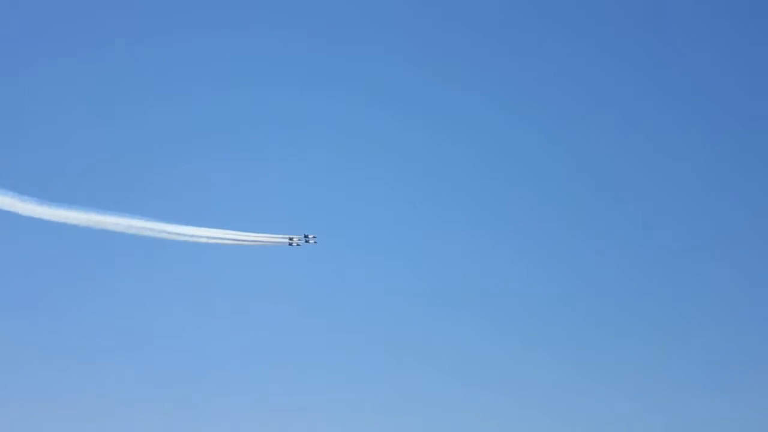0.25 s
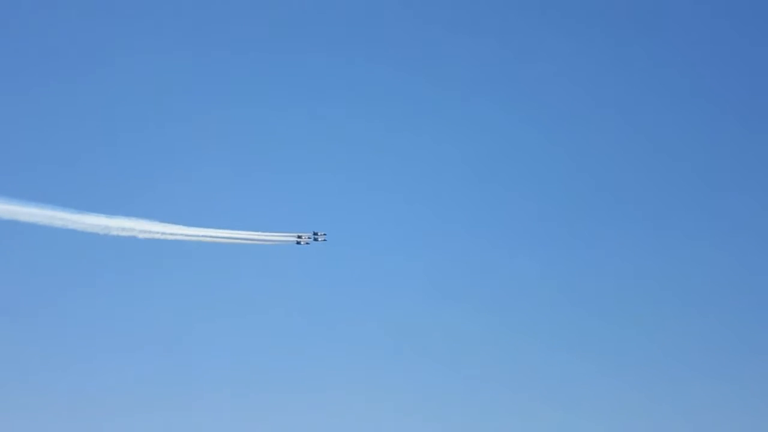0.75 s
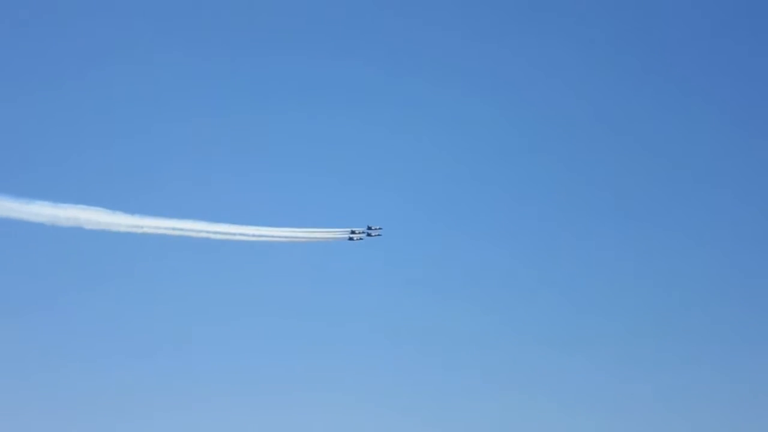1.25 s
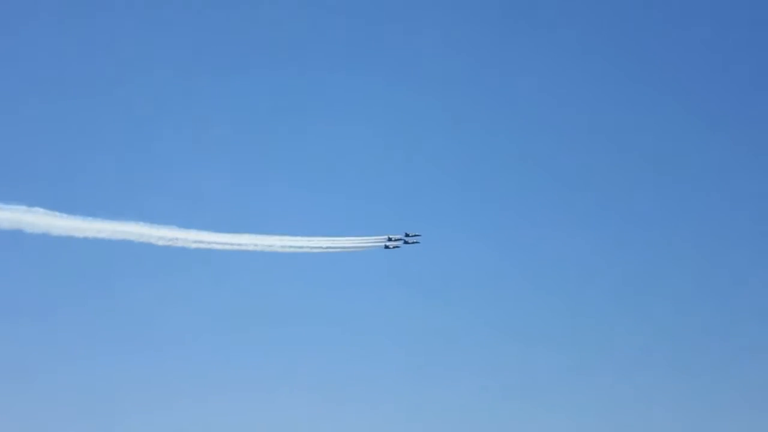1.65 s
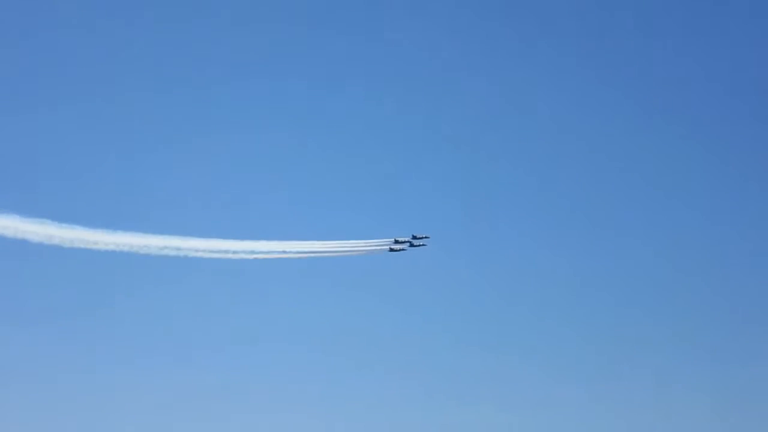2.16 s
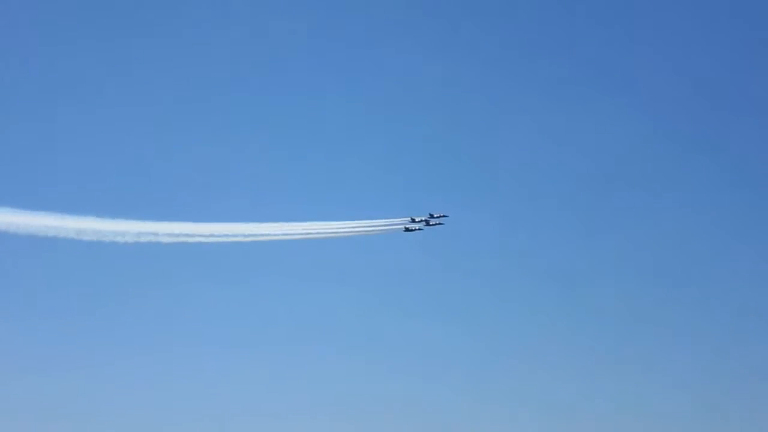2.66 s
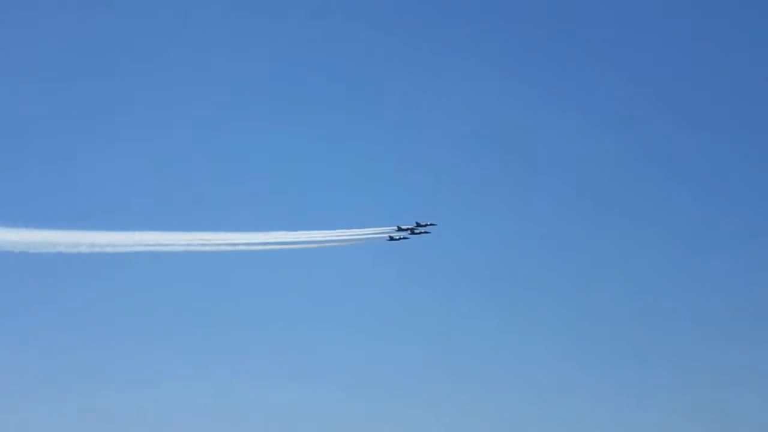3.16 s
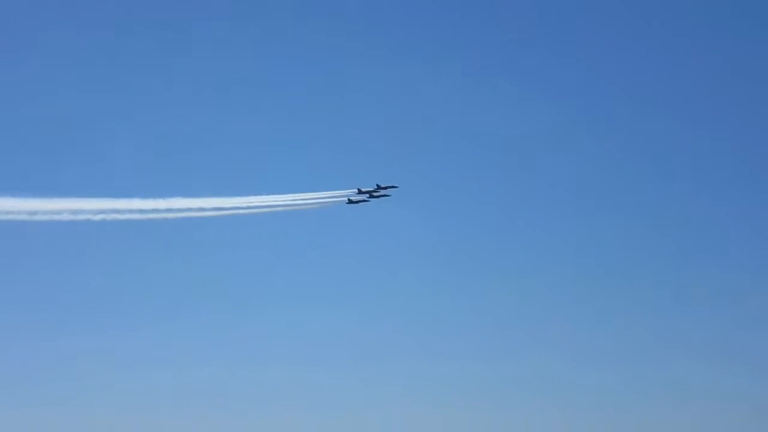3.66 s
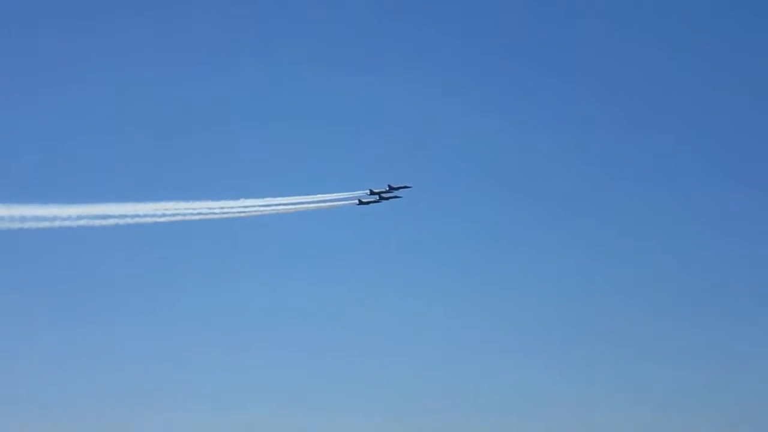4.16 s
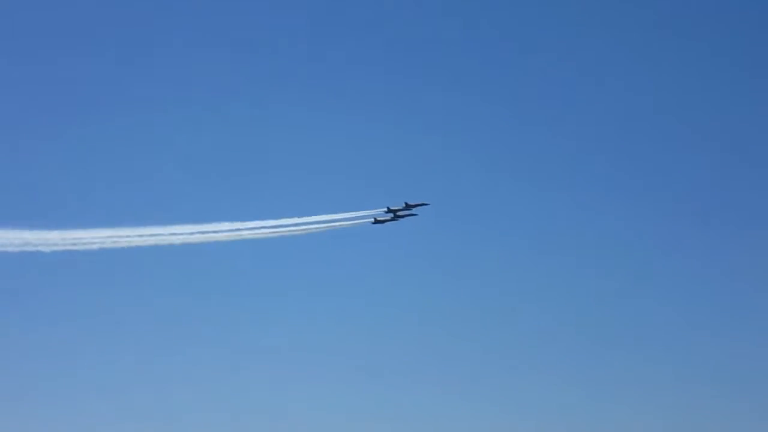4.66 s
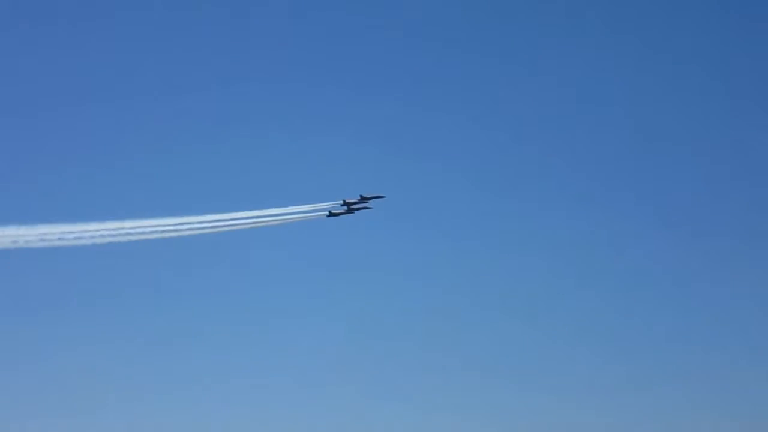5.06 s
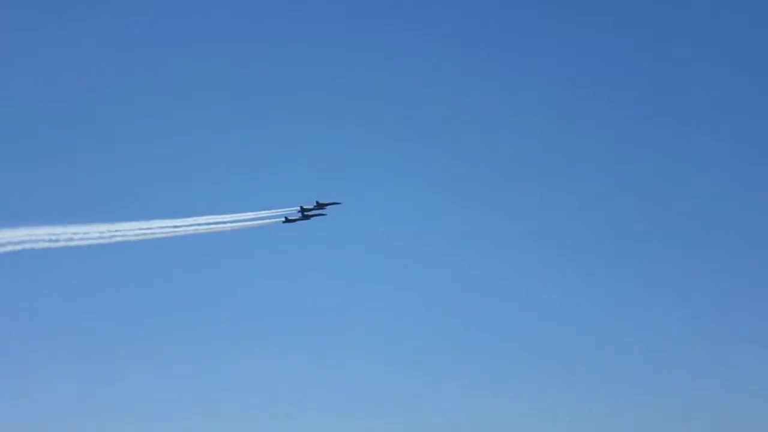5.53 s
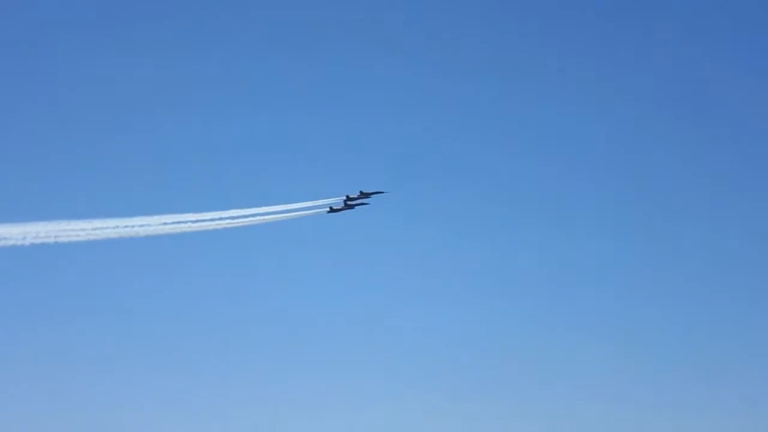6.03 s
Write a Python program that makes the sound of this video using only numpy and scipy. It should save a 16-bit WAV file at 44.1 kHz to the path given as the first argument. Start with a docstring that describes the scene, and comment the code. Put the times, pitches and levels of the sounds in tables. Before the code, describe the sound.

Distant jets rumble low across an open sky, then their hollow roar surges into loud ragged bursts while wind thumps the microphone.

```python
"""A deep rumble and a faint hollow roar, noise shaped in fluttering bands, come from jets high in the sky.
Wind noise and thumps, short low cycles, strike the microphone; wavering hums and faint short high tones
come and go. Wavelets form sharp crests, first of the rumble, then of the roar as it surges near 800 Hz.
Meanwhile a thin bright hiss with two steady whines sinks, mostly step by step and creeping back between.
In the loudest surges of the later roar, filtered impulses add sharp ticks and a faint crackle."""
import sys
import numpy as np
from scipy import signal
from scipy.fft import rfft, irfft, next_fast_len
from scipy.io import wavfile
from scipy.ndimage import uniform_filter1d, minimum_filter1d

SR = 44100
rng = np.random.default_rng(int(sys.argv[2]) if len(sys.argv) > 2 else 0)


def output_pcm(signal):
    """Save a mono or channel-first signal as 16-bit PCM at the path in sys.argv[1].

    Samples are clipped to [-1, 1] before scaling.
    """
    pcm = np.clip(np.atleast_2d(signal).T, -1, 1) * 32767
    wavfile.write(sys.argv[1], SR, np.round(pcm).astype(np.int16))


N = 277389   # samples

# Levels are those of each source before the limiter; a spectrum's levels are relative.
# Hollow roar, torn into surges: (time [s], level [dB])
ROAR_LEVEL = [(0.0, -34.5), (0.14, -37), (1.12, -30), (1.89, -30.5), (2.94, -22), (3.03, -16.5),
              (3.25, -16.5), (3.5, -19), (3.87, -20), (3.94, -23.5), (4.09, -20.5), (4.105, -22),
              (4.15, -26), (4.17, -19), (4.3, -17.5), (4.43, -12.5), (4.45, -11.5), (4.52, -19),
              (4.55, -13.5), (4.58, -16), (4.6, -8), (4.615, -16.5), (4.64, -13), (4.68, -21), (4.85, -11),
              (4.92, -17.5), (5.03, -13), (5.2, -15.5), (5.26, -9), (5.29, -21), (5.32, -14.5),
              (5.38, -24.5), (5.39, -21), (5.51, -21.5), (5.55, -16), (5.61, -24.5), (5.64, -16),
              (5.69, -23.5), (5.71, -3.5), (5.79, -16), (5.86, -12.5), (5.885, -20.5), (5.91, -11.5),
              (5.95, -17.5), (5.98, -12.5), (6.04, -8.5), (6.09, -17.5), (6.12, -13.5), (6.18, -18),
              (6.22, -17.5), (6.29, -15)]
# Band of the hollow roar: (time [s], centre [Hz], width [factor])
ROAR_BAND = [(0, 657, 1.3), (2, 690, 1.28), (3.1, 682, 1.18), (3.9, 719, 1.2), (4.2, 749, 0.96),
             (4.33, 810, .85), (4.45, 775, 0.87), (4.6, 740, .85), (4.85, 770, 1.1), (5.0, 800, 1.2),
             (5.3, 804, 1.18), (5.6, 810, 1.1), (5.72, 790, .6), (5.82, 820, 1.2), (5.91, 860, 0.97),
             (5.98, 790, 1.5), (6.06, 810, 1), (6.17, 860, 1.1), (6.29, 830, 1.1)]
ROAR_LOW_OCT, ROAR_HIGH_OCT = 0.18, 0.24   # widths below and above the centre, before the factor
ROAR_SKIRT_DB, ROAR_WANDER_HZ = -19.5, 28.7   # floor of the bell; rms wander of its centre

# Sharp crests of the rumble (near 300 Hz) and of the roar (700-900 Hz):
# (time [s], envelope peak [dB], pitch [Hz])
CRESTS = [(1.033, -14, 300), (1.11, -17, 310), (2.81, -14, 340), (2.995, -14, 300), (3.17, -12, 285),
          (4.221, -8, 800), (4.382, -6, 760), (4.440, -2.5, 790), (4.449, -6, 770), (4.591, -5, 730),
          (4.625, -6, 736), (4.639, -3, 780), (4.805, -7, 760), (4.845, -5, 762), (5.018, -7, 760),
          (5.04, -6, 716), (5.098, -6, 851), (5.255, -5, 880), (5.312, -10, 866), (5.68, -11, 800),
          (5.715, -5, 812), (5.74, -5, 780), (5.772, -5.5, 803), (5.781, -6, 800), (5.912, -7, 830),
          (5.959, -7, 773), (6.024, -5, 760), (6.044, -5, 780), (6.0565, -1, 790), (6.075, -5, 780)]
CREST_CYCLES = 2.4   # envelope half-width at 1/e
CREST_SHARE, CREST_LULL_S = 0.75, 0.011   # part of the roar withdrawn around a crest, and for how long

# Deep rumble: (time [s], level [dB])
RUMBLE_LEVEL = [(0.0, -28.5), (0.65, -32.5), (1.03, -21), (1.23, -28.5), (1.26, -23), (1.65, -28),
                (2.07, -22), (2.1, -28), (2.47, -29), (2.5, -22.5), (2.68, -27), (2.82, -16.5), (2.87, -18),
                (2.94, -22), (3.0, -19.5), (3.08, -21), (3.19, -18), (3.26, -17), (3.32, -19), (3.48, -25),
                (3.64, -20.5), (3.98, -33.5), (4.05, -23.5), (4.1, -33), (4.17, -28), (4.2, -31.5),
                (4.26, -29.5), (4.35, -32), (4.5, -25.5), (4.57, -32.5), (4.62, -20.5), (4.66, -33),
                (5.19, -25.5), (5.32, -36), (5.87, -26.5), (5.92, -31.5), (6.04, -22), (6.24, -34.5),
                (6.29, -26.5)]
# Centre of the rumble: (time [s], frequency [Hz])
RUMBLE_CENTRE = [(0, 286.7), (1.1, 281), (1.6, 337), (2.0, 311), (2.8, 322), (3.17, 295.3), (3.4, 374),
                 (4.2, 320.5), (5.4, 416), (6.29, 400)]
RUMBLE_LOW_OCT, RUMBLE_HIGH_OCT, RUMBLE_SKIRT_DB = 0.32, 0.4, -6   # widths below and above; floor

# Upper roar: (time [s], level [dB], tilt [dB per octave])
UPPER_LEVEL = [(0.0, -44.5, 5), (2.0, -43.5, 5.5), (2.25, -44.5, 5.5), (2.5, -43, 5), (3.17, -35.5, 1.5),
               (3.7, -37, 0.5), (4.13, -39.5, 1.5), (4.45, -32, 0), (4.75, -33.5, -3), (5.03, -28.5, 2),
               (5.38, -31, -2), (5.99, -26, 3.5), (6.06, -21.5, -0.5), (6.1, -27, 1), (6.29, -28, 1.7)]
# Spectral density of the upper roar before tilting: (frequency [Hz], level [dB per Hz])
UPPER_COLOUR = [(1000, -2), (1430, -7.5), (1830, -23), (2300, -38), (2700, -47.5), (3100, -59), (3900, -80)]

# Ground dip in the rumble and roar
DIP_START_HZ, DIP_RISE_HZ_S, DIP_WIDTH_OCT = 452, 11, 0.12
DIP_DB, DIP_GONE_S = -12.5, 2.8   # depth at the start; time at which it has faded

# Ticks on the roar's crests: (time [s], peak [dB], second swing relative to the first [dB])
TICKS = [(3.964, -44, -2), (4.440, -48, -3), (4.6402, -30, -20), (4.849, -47, -5), (5.100, -47, -5),
         (5.258, -45, -5), (5.717, -49, -6), (5.742, -52, -8), (5.774, -50, -6), (6.035, -50, -8),
         (6.0415, -46, -8), (6.0565, -30, -6)]
TICK_TWIN_S = 0.0006   # delay of the second, opposite impulse
# Most impulses per second; their rms peak; roar level at which that rate is reached
CRACKLE_PER_S, CRACKLE_DB, CRACKLE_ABOVE_DB = 230, -62.5, -10

# Wind on the microphone: (time [s], level [dB])
WIND_LEVEL = [(0.0, -32.5), (0.3, -30), (0.47, -32), (0.66, -33.5), (1.21, -30.5), (1.37, -22),
              (1.59, -30.5), (2.31, -30), (2.45, -27), (2.8, -21.5), (3.1, -20), (3.22, -20), (3.52, -18.5),
              (3.75, -24), (4.31, -25.5), (4.64, -29), (4.84, -28), (5.06, -29), (5.29, -31), (5.57, -35),
              (5.92, -29), (6.29, -34)]
# Brightness of the wind: (time [s], tilt [dB per octave])
WIND_TILT = [(0, -6.5), (1.3, -4.5), (2.6, -6.5), (3.1, -3.5), (3.6, -1.5), (4.2, -2.5), (6.29, 0.9)]
# Spectral density of the wind before tilting: (frequency [Hz], level [dB per Hz])
WIND_COLOUR = [(12, -37), (20, -15.5), (75, 0.5), (119, -1.5), (177, 5), (228, -9), (289, -15), (400, -5),
               (520, -35), (880, -120)]

# Wind thumps: (time [s], envelope peak [dB], pitch [Hz], envelope half-width at 1/e [cycles])
THUMPS = [(1.21, -17, 70, 1.2), (1.262, -10.5, 113, 0.74), (1.335, -15, 83, 0.74), (1.385, -13, 84, 0.98),
          (1.438, -5.5, 154, 0.45), (1.475, -13.5, 64, 1.1), (2.267, -7.5, 128, 0.64),
          (2.545, -13, 106, 0.74), (2.81, -14.5, 80, 2.1), (2.865, -13.5, 90, 0.75),
          (3.099, -9.5, 175, 0.39), (3.435, -8.5, 186, 0.7), (3.538, -9, 180, 1.7), (3.601, -10, 110, 0.22),
          (3.628, -9, 55, 0.9), (3.634, -1, 88, 0.21), (3.651, -3.5, 172, 0.5), (3.66, -16, 39.7, 0.7),
          (3.674, -5, 78, 0.5), (3.998, -5, 125, 0.36), (4.0388, 1.5, 344, 0.31), (4.042, -11.5, 178, 0.96),
          (4.053, -13.5, 105, 2), (4.077, -9, 151, 0.77), (4.156, -15.5, 450, 0.7),
          (4.162, -10.5, 310, 0.9), (4.214, -14, 81, 0.73), (4.249, -6, 195, 0.31),
          (4.51, -12.5, 183, 0.55), (4.635, -14.5, 190, 1)]

# Low hums and faint short high tones: (start [s], length [s], pitch [Hz], rms level [dB])
HUMS = [(0.27, 0.14, 2420, -62), (1.06, .18, 3830, -73), (1.875, 0.15, 175, -23.5),
        (2.115, 0.084, 2080, -62), (2.21, 0.099, 2050, -61), (2.45, 0.083, 2110, -62),
        (4.27, 0.37, 170.5, -31), (4.865, 0.26, 158.1, -27), (5.141, 0.097, 174.6, -26),
        (6.02, 0.4, 129.4, -34.5)]
HUM_FADE_S, HUM_WAVER = 0.033, 0.011   # linear fade; rms waver as a share of the pitch

# Hiss steps: (time [s], level just after the step [dB])
HISS_STEPS = [(0, -55.5), (3.25, -58.5), (3.69, -61.5), (4.051, -64), (4.45, -65.5), (4.645, -69.5),
              (5.27, -72), (5.79, -70.5)]
HISS_START_DB, HISS_RETURN_DB_S = HISS_STEPS[0][1], 0.5   # ceiling; creep back between steps
# Spectral density of the hiss at its starting level: (frequency [Hz], level [dB per Hz])
HISS_COLOUR = [(1400, 13), (2000, 16.5), (2500, 7), (3000, 5.5), (3600, 1.5), (5000, 0), (8000, -0.5),
               (10500, -3), (13000, -7), (15000, -15.5)]
# Extra loss for each dB the hiss has sunk: dB per octave above 10 kHz, and per octave below 4 kHz
HISS_DULL_DB_OCT, HISS_THIN_DB_OCT = 0.4, 0.4
# Steady whines: (frequency [Hz], rms level while the hiss is at its starting level [dB])
WHINES = [(7298, -88), (10298, -88)]

EVEN_S, EVEN_SHARE = 0.05, 0.24   # averaging time of noise swells; share of the swell levelled, in dB
CUTOFF_HZ = 15050   # upper edge of the recorded band


def jets():
    """Superposition: the pressures of the three noise bands and the crests add linearly."""
    return rumble() + roar() + upper_roar() + crests()


def roar():
    """Band-limited turbulence: jet noise, fluttered by eddies along its path, yields power around each crest."""
    level_db, = in_time(ROAR_LEVEL)
    centre_hz, width = in_time(ROAR_BAND)
    centre_hz = centre_hz + ROAR_WANDER_HZ * drift(5.2)

    def colour_db(hz):
        bell_db = hump_db(hz, centre_hz, width * ROAR_LOW_OCT, width * ROAR_HIGH_OCT, ROAR_SKIRT_DB)
        return bell_db + ground_dip_db(hz)

    noise = turbulent_noise(np.geomspace(520, 1250, 11), colour_db, 0.93, 1.2, 6.2)
    return crest_lull() * from_db(level_db) * noise


def crest_lull():
    """Amplitude weighting: smoothed rectangular windows lower the roar's gain around every crest."""
    marks, size = np.zeros(N), round(CREST_LULL_S * SR)
    marks[[round(s * SR) for s, _, _ in CRESTS]] = size
    windows = uniform_filter1d(marks, size=size)
    windows = uniform_filter1d(windows, size=size // 2)
    return 1 - CREST_SHARE * np.minimum(windows, 1)


def crests():
    """Wave packets: cycles under a Gaussian envelope form each sharp crest of the rumble or roar."""
    return wavelets([(*crest, CREST_CYCLES) for crest in CRESTS])


def rumble():
    """Band-limited turbulence: the low part of the jet noise, fluttered by eddies along its path."""
    level_db, = in_time(RUMBLE_LEVEL)
    centre_hz, = in_time(RUMBLE_CENTRE)

    def colour_db(hz):
        bell_db = hump_db(hz, centre_hz, RUMBLE_LOW_OCT, RUMBLE_HIGH_OCT, RUMBLE_SKIRT_DB)
        return bell_db + ground_dip_db(hz)

    return from_db(level_db) * turbulent_noise(np.geomspace(220, 560, 9), colour_db, 1.0, 0.5, 7.6)


def upper_roar():
    """Spectral roll-off: the upper jet noise falls steeply with frequency, under a changing tilt."""
    level_db, tilt_db = in_time(UPPER_LEVEL)

    def colour_db(hz):
        return at_hz(UPPER_COLOUR, hz) + tilt_db * np.log2(hz / 1300)

    return from_db(level_db) * turbulent_noise(np.geomspace(1050, 3800, 12), colour_db, 0.95, 0.91, 15.0)


def ground_dip_db(hz):
    """Spectral notch: a Gaussian dip in log frequency rises in pitch while its depth fades to nothing."""
    t = np.arange(N) / SR
    dip_hz = DIP_START_HZ + DIP_RISE_HZ_S * t
    depth_db = DIP_DB * np.clip(1 - t / DIP_GONE_S, 0, 1)
    return depth_db * np.exp(-(np.log2(hz / dip_hz) / DIP_WIDTH_OCT) ** 2)


def ticks():
    """Impulse response: isolated and random impulses ring a band-pass filter for a fraction of a millisecond."""
    band = signal.butter(2, [1500, 5000], "band", fs=SR, output="sos")
    roar_db, = in_time(ROAR_LEVEL)
    rate = CRACKLE_PER_S * np.minimum(from_db(3 * (roar_db - CRACKLE_ABOVE_DB)), 1)
    struck = rng.random(N) < rate / SR
    clicks = from_db(CRACKLE_DB) * rng.standard_normal(N) * struck
    for s, peak_db, twin_db in TICKS:
        clicks[round(s * SR)] = from_db(peak_db)
        clicks[round((s + TICK_TWIN_S) * SR)] = -from_db(peak_db + twin_db)
    unit_peak = np.abs(signal.sosfilt(band, signal.unit_impulse(64))).max()
    return signal.sosfilt(band, clicks + 1e-18) / unit_peak   # the tiny offset avoids denormal numbers


def wind():
    """Turbulent pressure: wind at the microphone is lumpy low noise whose spectral tilt varies in time."""
    level_db, = in_time(WIND_LEVEL)
    tilt_db, = in_time(WIND_TILT)

    def colour_db(hz):
        return at_hz(WIND_COLOUR, hz) + tilt_db * np.log2(hz / 80)

    return from_db(level_db) * turbulent_noise(np.geomspace(18, 240, 11), colour_db, 0.7, 1.0, 17.0)


def thumps():
    """Transient pressure: an eddy bursting on the microphone gives a short swing, mostly at low pitch."""
    return wavelets(THUMPS)


def hum():
    """Frequency modulation: integrating a slightly wavering pitch gives the phase of each faded tone."""
    out, t = np.zeros(N), np.arange(N) / SR
    for start, length, hz, level_db in HUMS:
        gate = np.clip(np.minimum(t - start, start + length - t) / HUM_FADE_S, 0, 1)
        cycles = np.cumsum(hz * (1 + HUM_WAVER * drift(10.4))) / SR
        out += gate * from_db(level_db) * np.sqrt(2) * np.sin(2 * np.pi * cycles)
    return out


def hiss():
    """Broadband noise with pure tones: both share one level, and the noise loses its edges as it sinks."""
    t = np.arange(N) / SR
    at, after_db = np.transpose(HISS_STEPS)
    last = np.searchsorted(at, t, side="right") - 1
    level_db = np.minimum(after_db[last] + HISS_RETURN_DB_S * (t - at[last]), HISS_START_DB)
    level_db = uniform_filter1d(level_db, size=400)   # rounds the steps over about 9 ms
    sunk_db = level_db - HISS_START_DB

    def colour_db(hz):
        dull = HISS_DULL_DB_OCT * np.log2(hz / 10000)
        thin = HISS_THIN_DB_OCT * np.log2(4000 / hz)
        return at_hz(HISS_COLOUR, hz) + sunk_db * max(dull, thin, 0)

    noise = turbulent_noise(np.geomspace(1400, 16000, 10), colour_db, 0.34, 0.4, 9.0)
    whines = sum(from_db(db) * np.sqrt(2) * np.sin(2 * np.pi * hz * t) for hz, db in WHINES)
    return from_db(level_db) * noise + from_db(sunk_db) * whines


def turbulent_noise(centres, colour_db, shared_db, own_db, rate):
    """Filter-bank synthesis: overlapping noise bands flutter partly together, partly alone, at unit rms."""
    size = next_fast_len(N)
    white = rfft(rng.standard_normal(size))
    octaves = np.log2(np.arange(1, size // 2 + 2) * SR / size)
    step = np.log2(centres[1] / centres[0])
    together = drift(rate)
    out, power = 0, 0
    for hz in centres:
        offset = np.clip((octaves - np.log2(hz)) / step, -1, 1)
        band = irfft(white * np.cos(np.pi / 2 * offset) ** 2, size)[:N]
        gain = from_db(colour_db(hz))
        flutter = from_db(shared_db * together + own_db * drift(rate))
        out = out + gain * flutter * band
        power = power + gain ** 2 * np.mean(band ** 2)
    out = out / np.sqrt(power)   # a change of colour leaves the expected power even
    swell = uniform_filter1d(out ** 2, size=round(EVEN_S * SR)) + 1e-6
    return rms_one(out / swell ** (EVEN_SHARE / 2))


def wavelets(events):
    """Gaussian wave packets: each sine swings negative, then positive, about its envelope's centre."""
    out, t = np.zeros(N), np.arange(N) / SR
    for s, peak_db, hz, cycles in events:
        near = slice(round((s - 0.05) * SR), round((s + 0.09) * SR))
        turns = (t[near] - s) * hz - 0.6   # the envelope peaks 0.6 cycle after the listed time
        out[near] += from_db(peak_db) * np.sin(2 * np.pi * turns) * np.exp(-(turns / cycles) ** 2)
    return out


def drift(rate):
    """Low-pass random process: noise on every 40th sample through two poles at rate [Hz], scaled to unit rms."""
    r = np.exp(-80 * np.pi * rate / SR)
    sparse = rng.standard_normal(N // 40 + 2002)
    slow = signal.lfilter([1], [1, -2 * r, r * r], sparse)[2000:]   # drops the filter's onset
    return np.interp(np.arange(N) / 40, np.arange(len(slow)), rms_one(slow))


def hump_db(hz, centre_hz, low_oct, high_oct, skirt_db):
    """Resonance-like band shape: a lopsided bell in log frequency levels off on its skirts."""
    off = np.log2(hz / centre_hz)
    bell = np.exp(-(off / np.where(off < 0, low_oct, high_oct)) ** 2)
    return 10 * np.log10(bell + from_db(2 * skirt_db))


def at_hz(points, hz):
    """Logarithmic frequency scale: a spectrum is interpolated linearly in dB over log frequency."""
    spectrum_hz, level_db = np.transpose(points)
    return np.interp(np.log(hz), np.log(spectrum_hz), level_db)


def in_time(rows):
    """Linear interpolation: the columns after time are read sample by sample."""
    s, *columns = np.transpose(rows)
    return [np.interp(np.arange(N) / SR, s, c) for c in columns]


def from_db(db):
    """Decibel law: 20 dB is a factor of ten in amplitude."""
    return 10 ** (np.asarray(db) / 20)


def rms_one(x):
    """Power normalization: the signal is scaled to unit rms."""
    return x / np.sqrt(np.mean(x ** 2) + 1e-20)


def scene():
    """Superposition: the pressures of all sources add at one microphone."""
    return (jets() + ticks() + wind() + thumps() + hum() + hiss())[None]


def record(dry):
    """Peak limiting and low-pass filtering: gain eases down around excessive crests, then the top is cut."""
    room = np.minimum(1, 0.97 / (np.abs(dry) + 1e-9))
    gain = minimum_filter1d(room, size=601)   # holds each reduction for about 14 ms
    gain = uniform_filter1d(gain, size=301)
    gain = uniform_filter1d(gain, size=301)
    top_cut = signal.ellip(10, 0.5, 80, CUTOFF_HZ, fs=SR, output="sos")
    return signal.sosfilt(top_cut, dry * gain)


dry = scene()
out = record(dry)
output_pcm(out)
```